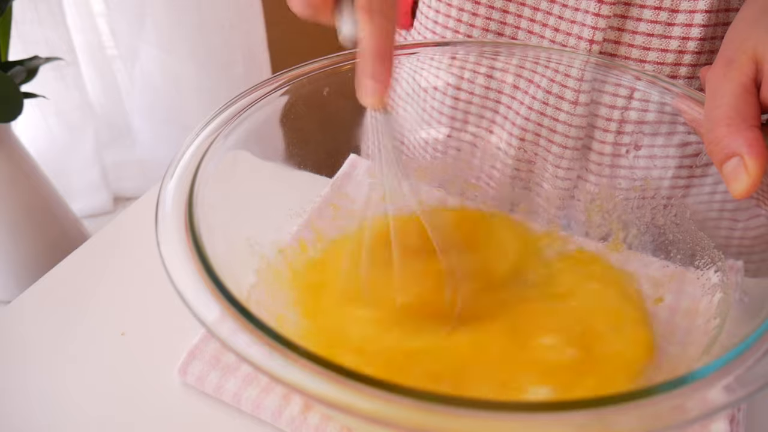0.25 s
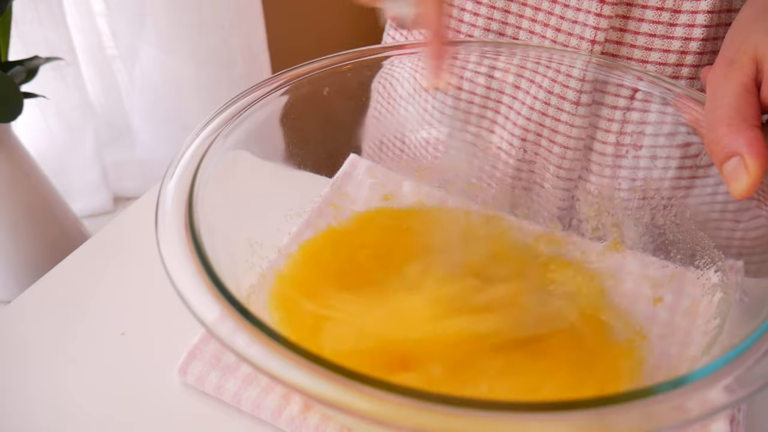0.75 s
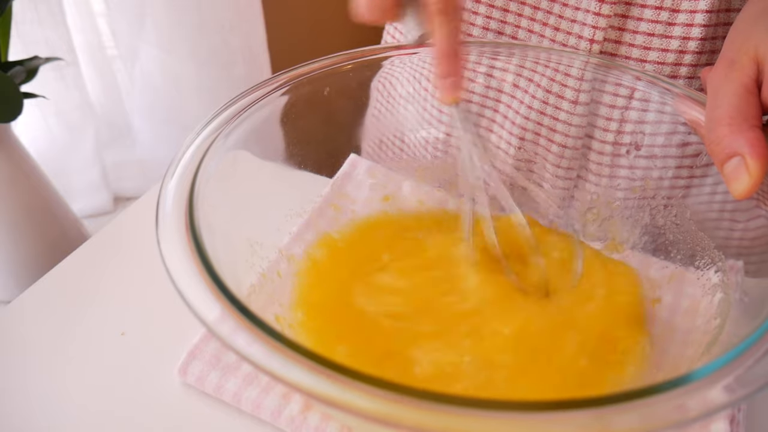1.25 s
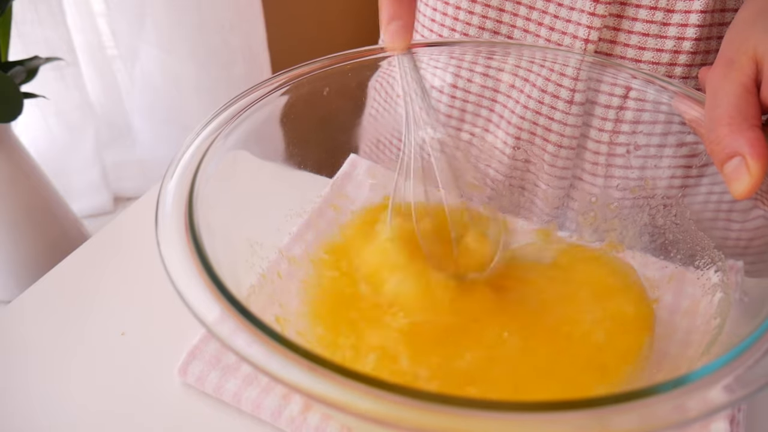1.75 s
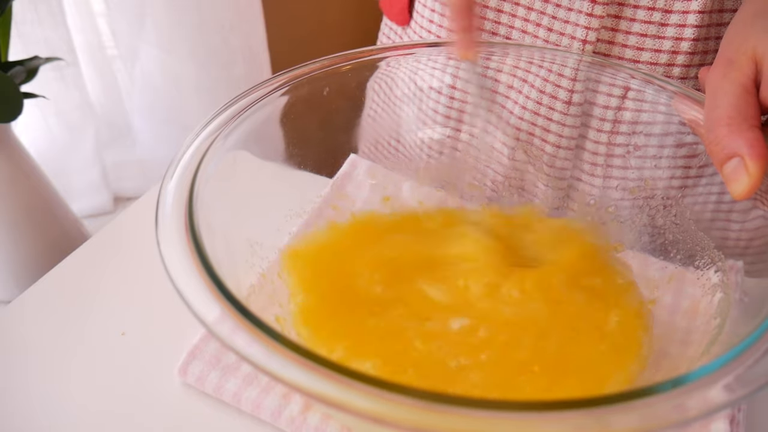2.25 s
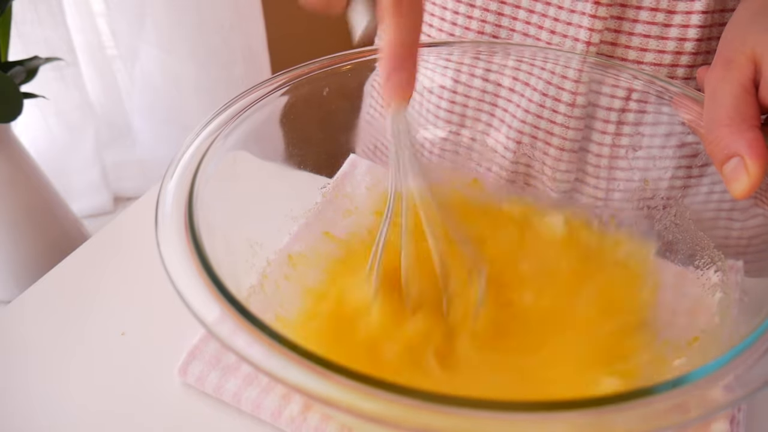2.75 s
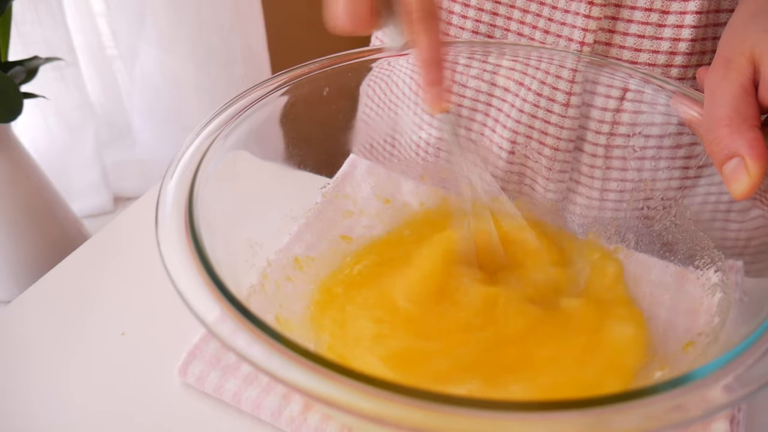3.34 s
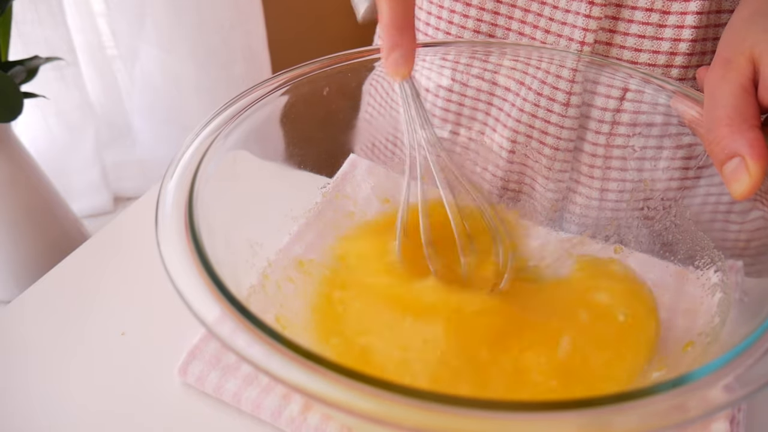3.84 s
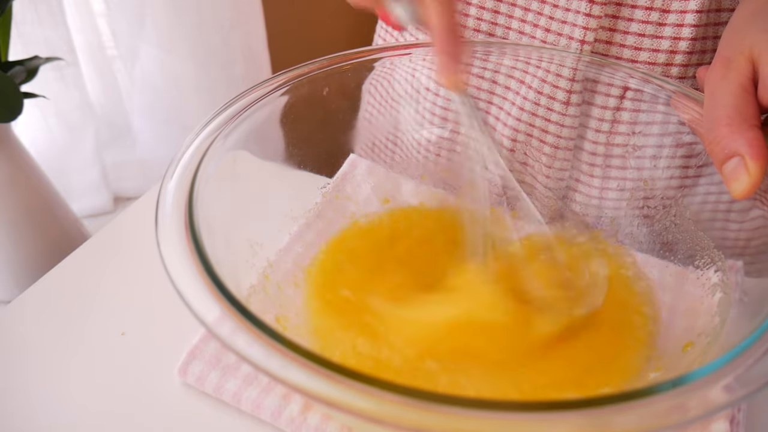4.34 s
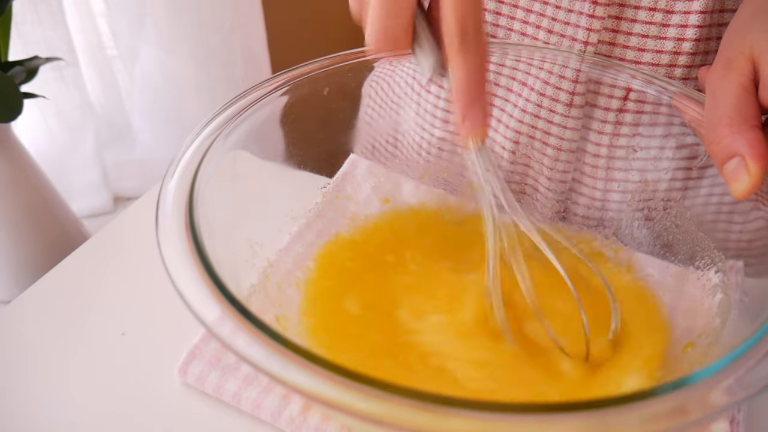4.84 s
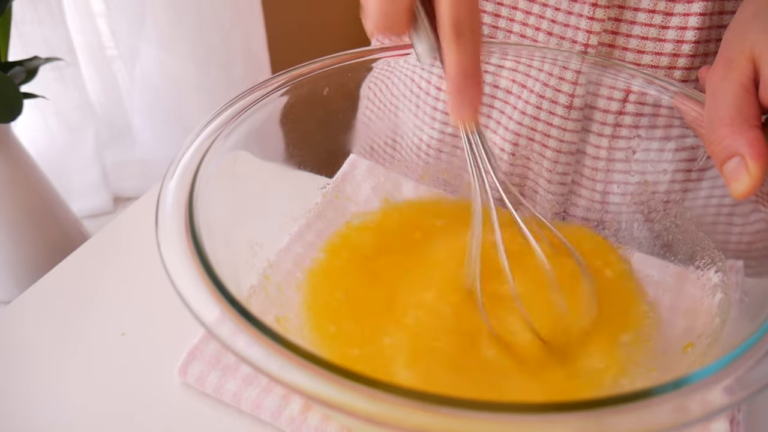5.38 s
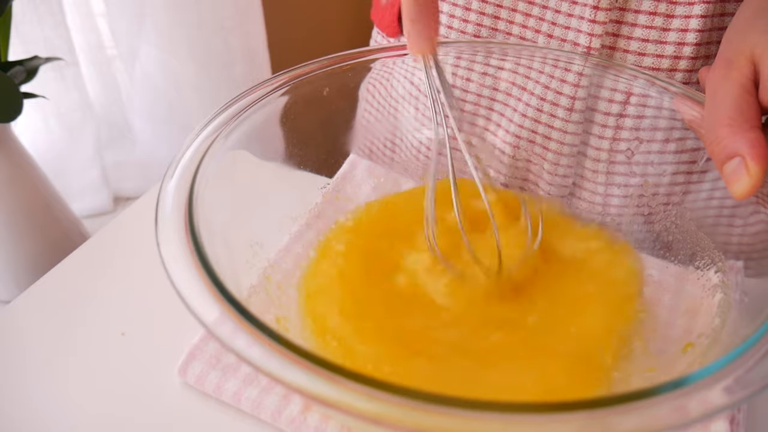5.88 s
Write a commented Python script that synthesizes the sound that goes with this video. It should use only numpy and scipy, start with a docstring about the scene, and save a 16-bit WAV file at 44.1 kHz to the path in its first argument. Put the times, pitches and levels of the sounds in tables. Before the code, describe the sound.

Rapid regular whisking: thin wires tick on glass, liquid egg fizzes, gurgles and sloshes low, and small bubbles pop sharply between strokes. It starts light and uneven, grows firmer, becomes deeper and irregular in the middle with low glugs, then settles into even, brighter, drier taps. The bowl sits on cloth, so its ring is very short. Close stereo pickup, little room echo, almost silent background.

```python
"""In a small, dry kitchen, a wire whisk beats eggs and sugar in a glass bowl on a folded cloth, close up.
About four and a half times a second, bursts of clicks strike glass modes and filtered noise drags through egg:
a wet fizz of snaps and pings, gurgles in the bowl's hollow, a low slosh. Midway, deep beating glugs with air;
toward the end the whisk stirs, with harder clicks and less fizz. Films and pockets burst as short damped pings."""
import sys
import numpy as np
from scipy import signal
from scipy.fft import rfft, irfft, next_fast_len
from scipy.io import wavfile
from scipy.ndimage import map_coordinates

SR = 44100
rng = np.random.default_rng(int(sys.argv[2]) if len(sys.argv) > 2 else 0)


def master_out(mix):
    """Clip the mix to full scale and print it as 16-bit PCM to the path in sys.argv[1]."""
    frames = np.transpose(np.atleast_2d(mix))
    ceiling = np.clip(frames, -1, 1)
    pcm = np.round(ceiling * 32767).astype(np.int16)
    wavfile.write(sys.argv[1], SR, pcm)


N = 269451  # length [samples]

# Levels are relative: each layer trims them again in the mix.
# quiet of the kitchen: (frequency [Hz], density [dB per Hz, relative])
QUIET_COLOUR = [(20, -4), (50, 0.5), (100, -7.5), (250, -16.5), (600, -20), (1000, -26.5), (3000, -24.5),
                (8000, -33), (16000, -39)]
QUIET_DB = -64  # rms

# one turn of the whisk, wires landing on glass then dragging through egg:
# (time [s], drag length [s], click [dB], knock [dB], mass of egg pushed [dB], fizz [dB])
STROKES = [(.0045, 0.13, -32, -43.5, -55, -36.5), (0.2119, 0.088, -37.5, -53, -53.5, -42),
           (0.4335, 0.14, -37, -36.5, -60.5, -41), (0.647, .085, -52, -49, -68.5, -50.5),
           (.862, 0.1, -33, -38, -52, -39), (1.0723, .12, -31.5, -31.5, -51, -30.5),
           (1.28, 0.1, -25.5, -30, -51, -36), (1.4798, 0.12, -29, -30, -52, -36),
           (1.685, 0.078, -24.5, -30, -48, -33.5), (1.8823, 0.086, -31.5, -30, -46, -38),
           (2.111, 0.066, -35, -34.5, -51, -30), (2.223, 0.12, -48, -55, -58.5, -42.5),
           (2.344, 0.072, -38, -42.5, -55.5, -43), (2.4221, 0.13, -32, -40, -62.5, -43),
           (2.599, 0.053, -32.5, -42, -63, -38.5), (2.668, .15, -42, -45, -53, -38),
           (2.788, 0.07, -31, -66, -70, -55.5), (2.9014, 0.092, -48, -30.5, -60, -41.5),
           (3.014, 0.071, -71, -58, -75, -55.5), (3.118, 0.062, -36, -58, -53, -34),
           (3.3693, 0.083, -27.5, -33, -51.5, -41), (3.579, 0.097, -27, -32.5, -49, -41.5),
           (3.772, .12, -34.5, -40, -50, -36.5), (3.9812, .11, -31.5, -36.5, -52, -40.5),
           (4.2068, .12, -27, -39, -50, -40), (4.4383, 0.12, -23, -34, -53, -42.5),
           (4.6594, 0.1, -24.5, -29, -53, -45), (4.8975, 0.13, -22, -36.5, -52.5, -52),
           (5.1414, .11, -24, -37.5, -50, -46.5), (5.367, .11, -23.5, -34.5, -50.5, -46.5),
           (5.598, 0.097, -22.5, -25, -52.5, -44), (5.8296, 0.09, -29, -28, -48.5, -48),
           (6.049, 0.072, -23.5, -29, -49, -38)]
# wires catching the glass again within a stroke: (time [s], click [dB], knock [dB])
CATCHES = [(.0918, -32, -59), (0.482, -41.5, -64), (0.5147, -39, -63), (1.0904, -35, -53),
           (1.1266, -35, -61), (1.4911, -33, -45), (1.889, -32.5, -33.5), (1.9308, -40, -49),
           (2.1209, -28.5, -37.5), (2.2713, -33.5, -48), (2.29, -36.5, -50), (2.4564, -41, -66),
           (2.5405, -38, -58), (2.621, -27.5, -33.5), (2.6793, -27, -42), (3.101, -38, -76),
           (3.14, -32, -40.5), (3.38, -30, -32.5), (3.8152, -35.5, -39), (3.997, -38, -42.5),
           (4.2232, -31.5, -41), (4.9566, -32, -62), (5.357, -40, -68), (5.389, -38, -52),
           (5.435, -34.5, -47), (5.4939, -38.5, -82), (5.8362, -29, -34), (5.8473, -32, -40)]
# single wires graze the glass at random during each drag
GRAZE_DB, GRAZE_SPREAD_DB, GRAZE_KNOCK_DB = -50.5, 0.5, -66.5

# colour of wire on glass: (frequency [Hz], density [dB per Hz, relative])
CLICK_COLOUR = [(500, -18), (900, -11), (1300, -6.5), (1900, -5.5), (2800, -1.5), (4200, -2.5),
                (5400, -6.5), (7400, -3), (9500, -3), (12000, -5), (15000, -7), (16500, -27)]
# colour of the bowl being knocked: (frequency [Hz], density [dB per Hz, relative])
KNOCK_COLOUR = [(30, -46), (80, -4), (180, -2.5), (300, -0.5), (450, -2.5), (700, -12.5), (1200, -27.5),
                (3000, -54.5)]
# colour of the bowl's hollow: (frequency [Hz], density [dB per Hz, relative])
HOLLOW_COLOUR = [(200, -26), (420, -7.5), (540, 2.5), (630, 6), (700, 1), (815, -18), (1200, -38),
                 (3000, -41)]
# modes of the bowl, damped by hand and cloth: (frequency [Hz], level [dB], 60 dB decay time [s])
GLASS_MODES = [(1314, -32.5, 0.018), (2780, -47.5, 0.018), (3656, -51, 0.088), (4870, -42, 0.033),
               (7570, -41.5, 0.037), (8800, -43.5, .04), (11500, -36.5, 0.044)]
# the hollow's level lies this share of the way from click to knock, then is offset
HOLLOW_FROM_KNOCK, HOLLOW_UNDER_DB = 0.3, -5.5
# egg covers more or less of the bowl from blow to blow: largest pitch shift of its hollow, as a share
HOLLOW_SHIFT = .07

# colour of egg tearing from the wires: (frequency [Hz], density [dB per Hz, relative])
FIZZ_COLOUR = [(500, -17.5), (900, -9.5), (1300, -11), (1900, -8.5), (2850, 3), (3600, -3.5), (4300, 0.5),
               (5500, -4), (7400, 3.5), (9500, -2), (12000, -3), (15000, -8), (16500, -20.5)]
# fizz reached by the end of a drag, however it starts: (time [s], level [dB])
SETTLED_FIZZ = [(.1, -43), (.3, -53.5), (.7, -64.5), (.95, -45), (1.2, -54.5), (1.8, -48), (2.15, -53.5),
                (2.55, -41), (3, -46.5), (3.45, -49.5), (3.9, -50.5), (4.1, -74), (4.35, -48.5), (5.4, -47),
                (5.7, -54.5), (6.1, -57)]
# colour of the low slosh: (frequency [Hz], density [dB per Hz, relative])
SLOSH_COLOUR = [(15, -32), (35, -14), (52, 2), (70, -12), (110, -13), (200, -48.5), (600, -55.5)]
# how far the bowl rocks on its cloth for the same push: (time [s], gain [dB])
ROCKING = [(0, 1), (.6, -7), (1.1, 1.5), (1.7, -1), (2.1, -1.5), (2.3, -10), (2.8, 0), (3.8, 1.5),
           (4.3, -2), (5.1, 6.5), (6.1, -1)]

# a pocket of air closes in the wake of each stroke, louder the more egg is pushed
WAKE_S, WAKE_OVER_DB, WAKE_HZ = 0.081, 5, 603
# short low tones and pings: closing air pockets, small bubbles, and one low knock tone:
# (time [s], peak [dB], starting pitch [Hz])
SHORT_TONES = [(2.268, -32.5, 674), (2.288, -31.5, 675), (2.36, -35.5, 3280), (2.426, -33, 983),
               (2.495, -39.5, 1920), (2.904, -25, 178), (3.247, -54.5, 683), (4.984, -38, 652)]
# bursting bubbles and films of egg:
# (time [s], level over a millisecond [dB], pitch [Hz], width [Hz], ring of the bowl's air [dB])
POPS = [(.124, -16.5, 7100, 1050, -34), (0.138, -28.5, 2520, 615, -47), (.3482, -44, 1390, 420, -55),
        (0.3886, -15, 1510, 724, -40), (0.5688, -11, 10900, 2600, -25), (0.5926, -38, 13100, 2670, -62),
        (.789, -44, 7690, 970, -61), (.8022, -28, 12000, 2150, -41.5), (1.0487, -27.5, 3000, 650, -39),
        (1.2321, -35.5, 2800, 510, -65), (1.4484, -31, 8750, 1180, -39.5), (1.86, -40, 1130, 360, -44),
        (1.9974, -38.5, 1340, 380, -48), (2.0198, -22.5, 3400, 480, -32.5),
        (3.7334, -26, 4840, 1050, -28.5), (3.9431, -28.5, 2550, 1710, -55), (3.9503, -21, 6670, 1650, -44),
        (3.9594, -28.5, 7900, 1930, -55), (4.152, -44.5, 3160, 1500, -58)]
# a faint film breaks as the whisk comes round, shortly before it lands
FILM_LEAD_S, FILM_DB, FILM_SPREAD_DB, FILM_HZ, FILM_WIDTH_HZ = 0.015, -51.5, 5.5, 2200, 960
# a faint noise swells up to each click, louder before a louder click
SWELL_S, SWELL_UNDER_DB, SWELL_RISE_S = 0.022, -25.5, 0.0079
# air beaten in while the whisk stays deep: (time [s], level of the glugs [dB])
GLUGS = [(2.2, -53), (2.3, -63), (2.43, -44.5), (2.58, -57), (2.68, -57), (2.9, -50.5), (3.2, -71)]

# how much louder the left microphone is than the right: (frequency [Hz], gain [dB])
LEFT_GAIN = [(50, 0), (120, 5), (300, 4.5), (700, 7.5), (1300, 4), (2400, 2), (4400, 3.3), (8000, .5),
             (15000, 3.5)]
# how far the left microphone lags for a source fully aside: (frequency [Hz], phase [rad])
LEFT_LAG = [(200, 0), (700, .1), (1500, .45), (4000, .55), (6000, 1.4), (9000, 1.6), (15000, 1.5)]
# the kitchen's ring: (frequency [Hz], 60 dB decay time [s])
KITCHEN_DECAY = [(100, 0.23), (1000, 0.41), (4000, 0.31), (14000, 0.057)]
EDGE_HZ = 16500  # top of the band


def amp(db):
    """Decibels to gain."""
    return 10 ** (np.asarray(db) / 20)


def unit(x):
    """Scales to rms 1."""
    return x / np.sqrt(np.mean(x ** 2) + 1e-20)


def scatter(shape=None):
    """Random values between -1 and 1."""
    return 2 * rng.random(shape) - 1


def seconds(length):
    """Time axis of the given length."""
    return np.arange(int(length * SR)) / SR


def over_time(points, **edges):
    """Joins (time, value) points over the whole scene."""
    return np.interp(np.arange(N) / SR, *np.transpose(points), **edges)


def over_pitch(points, hz):
    """Joins (Hz, value) points on a log-frequency axis."""
    f, value = np.transpose(points)
    return np.interp(np.log(hz + 1), np.log(f + 1), value)


def add(mix, s, sound):
    """Mixes a sound in at time s."""
    part = mix[max(round(s * SR), 0):][:len(sound)]
    part += sound[:len(part)]


def ring(colour, size=8192):
    """Causal minimum-phase impulse response of energy 1 with the given colour."""
    log_gain = np.log(amp(over_pitch(colour, abs(np.fft.fftfreq(size, 1 / SR)))))
    h = np.fft.ifft(np.exp(np.conj(signal.hilbert(log_gain)))).real[:size // 2]
    return h / np.linalg.norm(h)


def through(x, h):
    """Passes x through the impulse response h."""
    return signal.oaconvolve(x, h)[:len(x)]


def crackle(n, per_s, spread_db):
    """A train of tiny clicks, most small and a few large, rms 1."""
    size = amp(spread_db * np.minimum(rng.exponential(1, n), 3.5))
    return unit(size * rng.choice([-1, 1], n) * (rng.random(n) < per_s / SR))


def lumps(depth_db, lump_s):
    """A gain of rms 1 that glides to a new random value every lump_s."""
    knots = np.arange(0, N / SR + 1, lump_s)
    heights = rng.standard_normal(8192)[:len(knots)]
    return unit(amp(depth_db * np.interp(np.arange(N) / SR, knots, heights)))


def patchy(x, depth_db, patch_hz, patch_s):
    """The colour shifts from moment to moment as pockets of many sizes open and close."""
    hz, when, z = signal.stft(x, SR, nperseg=256)
    field = rng.standard_normal((128, 2048))
    grid = np.meshgrid(hz / patch_hz, when / patch_s, indexing="ij")
    db = depth_db * map_coordinates(field, grid, order=1, mode="wrap")
    # the colour moves while the mean power gain stays put
    gain = amp(db) / np.sqrt(np.mean(amp(db) ** 2, axis=0))
    return signal.istft(z * gain, SR, nperseg=256)[1][:N]


def bubbles(per_s, cycles, spread_db, low_hz, high_hz, rise=0.067, count=40):
    """Small bubbles of many sizes, each a short decaying ping that rises in pitch; rms 1."""
    out = np.zeros(N)
    for hz in np.geomspace(low_hz, high_hz, count):
        life = cycles / hz
        t = seconds(5 * life)
        ping = np.sqrt(hz) * np.exp(-t / life) * np.sin(2 * np.pi * hz * t * (1 + rise * t / t[-1]))
        pings = max(round(per_s * N / SR / count), 1)
        when, chance, side = rng.random((256, 3))[:pings].T
        sizes = np.sign(side - .5) * amp(spread_db * np.minimum(-np.log(chance), 3.5))
        for s, size in zip(when * N / SR, sizes):
            add(out, s, size * ping)
    return unit(out)


def quiet_room():
    """Steady coloured noise, independent at the two microphones."""
    colour = ring(QUIET_COLOUR)
    return amp(QUIET_DB) * np.array([through(rng.standard_normal(N), colour) for _ in range(2)])


def contacts():
    """Every touch of wire on glass: landings, catches and random grazes, as (s, click dB, knock dB)."""
    landings = [(s, click, knock) for s, _, click, knock, *_ in STROKES]
    chance = rng.random((len(STROKES), 2, 2))  # two grazes a drag
    grazes = [(s + length * when, GRAZE_DB + GRAZE_SPREAD_DB * (2 * force - 1), GRAZE_KNOCK_DB)
              for (s, length, *_), draws in zip(STROKES, chance) for when, force in draws]
    return landings + CATCHES + grazes


def glass(x):
    """The contact itself, plus the short ring of the bowl as decaying modes."""
    t = seconds(.12)
    modes = sum(amp(db - 60 * t / t60) * np.cos(2 * np.pi * hz * t) for hz, db, t60 in GLASS_MODES)
    return x + through(x, modes)


def strikes(rise_s=0.00036, chatter_s=0.0035, tail_db=-17, tail_s=0.017, click_db=-1, knock_db=0,
            hollow_db=0, top_db=-2, top_spread_db=3, rattle=1.0, hinge_hz=6000):
    """The wires land one after another within a few ms; their push knocks the bowl and rings its hollow."""
    t = seconds(.06)
    chatter = np.exp(-t / chatter_s) + amp(tail_db) * np.exp(-t / tail_s)
    chatter = (1 - np.exp(-t / rise_s)) ** 2 * chatter
    clicks, knocks, hollows = np.zeros((3, N))
    treble = signal.butter(2, hinge_hz, "high", fs=SR)
    bass = signal.butter(2, hinge_hz, fs=SR)
    knock = ring(KNOCK_COLOUR)
    # unit-energy sounds scaled so that levels hold over 5 ms (click) and 8 ms (thud)
    click_span, thud_span = np.sqrt(.005 * SR), np.sqrt(.008 * SR)
    for s, db, low_db in contacts():
        ring_db = db + HOLLOW_FROM_KNOCK * (low_db - db) + HOLLOW_UNDER_DB
        wires = chatter * crackle(len(t), per_s=9000, spread_db=1.0)
        # bare glass gives a bright click, a cushion of egg a dull one
        brightness = amp(top_db + top_spread_db * scatter())
        wires = signal.lfilter(*bass, wires) - brightness * signal.lfilter(*treble, wires)
        wires /= np.linalg.norm(wires)
        add(clicks, s, amp(db + click_db) * click_span * wires)
        # the bowl feels one firm push with the rattle of the wires on top
        push = rattle * wires
        push[40] -= 1
        hollow = ring(np.array(HOLLOW_COLOUR) * [1 + HOLLOW_SHIFT * scatter(), 1])
        thuds = (knocks, knock, low_db + knock_db), (hollows, hollow, ring_db + hollow_db)
        for mix, body, level_db in thuds:
            thud = through(push, body)
            add(mix, s, amp(level_db) * thud_span * thud / np.linalg.norm(thud))
    return glass(through(clicks, ring(CLICK_COLOUR))) + knocks + hollows


def stroke_level(start_db, end_db, rise_s, release_s, lead_db=-22, lead_s=0.061):
    """Level over all strokes: a faint swell before each, a rise as the wires dig in, a slide in dB, a release."""
    power = np.zeros(N + SR)  # one second of margin ahead of the first stroke
    t = seconds(.5) - .1
    for (s, length, *_), first, last in zip(STROKES, start_db, end_db):
        slide = amp(np.interp(t, [0, length], [first, last]))
        faint_swell = amp(lead_db) * np.exp(-abs(t) / lead_s)
        rise = 1 - np.exp(-(np.maximum(t, 0) / rise_s) ** 2) + faint_swell
        release = np.exp(-np.maximum(t - length, 0) / release_s)
        add(power, 1 + s + t[0], (slide * rise * release) ** 2)
    return np.sqrt(power[SR:])


def froth(fizz_db=-5, bubble_db=-10.0, clump_db=3, clump_s=0.0049, stray_db=-75):
    """Egg tears from the wires in clumps of tiny snaps and bubbles."""
    start, length, *_, first = np.transpose(STROKES)
    last = np.interp(start + length, *np.transpose(SETTLED_FIZZ))
    snaps = lumps(clump_db, clump_s) * crackle(N, per_s=7000, spread_db=3.5)
    snaps = patchy(snaps, depth_db=4.5, patch_hz=650, patch_s=.011)
    pings = bubbles(per_s=750, cycles=14, spread_db=2.5, low_hz=800, high_hz=5000, rise=.025)
    # the drag comes in slaps as one wire after another cuts the egg
    slaps = lumps(depth_db=2.8, lump_s=.011)
    level = slaps * stroke_level(first, last, rise_s=0.0039, release_s=0.024)
    fizz = level * (amp(fizz_db) * snaps + amp(bubble_db) * pings)
    # a few bubbles keep bursting in the foam between strokes
    stray = amp(stray_db) * bubbles(per_s=25, cycles=1.5, spread_db=5, low_hz=1300, high_hz=11000)
    return glass(through(fizz + stray, ring(FIZZ_COLOUR)))


def liquid(churn_db=-3, gurgle_db=-2, blub_db=-6, squelch_db=-11, slosh_db=0,
           churn_fall_db=6, gurgle_fall_db=4, slosh_fall_db=5, apart_db=-3):
    """The mass of egg churns, gurgles in the hollow of the bowl, and rocks it on the table."""
    *_, egg, _ = np.transpose(STROKES)

    def falling(fall_db, rise_s, release_s):
        """Each push starts above its mean level and slides as far below."""
        return stroke_level(egg + fall_db, egg - fall_db, rise_s, release_s)

    churning = falling(churn_fall_db, rise_s=0.0018, release_s=0.008)
    gurgling = falling(gurgle_fall_db, rise_s=0.0025, release_s=0.02)
    rocking = falling(slosh_fall_db, rise_s=0.0048, release_s=0.024) * amp(over_time(ROCKING))
    churn = through(churning * crackle(N, per_s=900, spread_db=.5), ring(KNOCK_COLOUR))
    gurgle = through(gurgling * crackle(N, per_s=600, spread_db=2.0), ring(HOLLOW_COLOUR))
    # the wake of the wires squelches shut
    squelch = gurgling * bubbles(per_s=400, cycles=4, spread_db=2.5, low_hz=850, high_hz=2300)
    # large bubbles folded into the egg
    blub = churning * bubbles(per_s=140, cycles=5.1, spread_db=0.5, low_hz=160, high_hz=737)
    body = amp(churn_db) * churn + amp(gurgle_db) * gurgle
    body += amp(squelch_db) * squelch + amp(blub_db) * blub
    # the rocking reaches each microphone through the table, partly unrelated
    slosh = ring(SLOSH_COLOUR)
    shared, apart = (amp(slosh_db) * rocking * unit(through(rng.standard_normal(N), slosh))
                     for _ in range(2))
    return body, shared + amp(apart_db) * np.outer([1, -1], apart)


def wakes(pitch_spread=0.2):
    """The air pocket behind each stroke, as (s, peak dB, starting pitch Hz)."""
    chance = scatter((len(STROKES), 2))
    return [(s + WAKE_S * (1 + .5 * when), egg_db + WAKE_OVER_DB, WAKE_HZ * (1 + pitch_spread * pitch))
            for (s, _, _, _, egg_db, _), (when, pitch) in zip(STROKES, chance)]


def short_tones(life_s=0.0057, rise_s=0.0033, glide_per_s=5.4):
    """Closing pockets, small bubbles and one low knock tone: brief decaying sines that glide up in pitch."""
    out, t = np.zeros(N), seconds(.05)
    shape = (1 - np.exp(-t / rise_s)) * np.exp(-t / life_s)
    shape /= shape.max()
    for s, db, hz in SHORT_TONES + wakes():
        tone = np.sin(2 * np.pi * hz * t * (1 + glide_per_s * t / 2))
        add(out, s, amp(db) * shape * tone)
    return out


def films(air_db=-56):
    """Faint bursts before each landing but the first, with the same columns as POPS."""
    chance = scatter((len(STROKES), 3))
    return [(s - FILM_LEAD_S * 2 ** when, FILM_DB + FILM_SPREAD_DB * force,
             FILM_HZ * 2 ** pitch, FILM_WIDTH_HZ, air_db)
            for (s, *_), (when, force, pitch) in zip(STROKES[1:], chance)]


def pops(snap_db=-5, snap_s=0.0005, tear_size=1.75, crack_power=1.8, rise_s=.0001,
         cavity_hz=1230, cavity_db=0, cavity_s=0.0027, scatter_db=-24, scatter_s=0.0045,
         lead_db=-24, lead_s=0.0075, low_hz=780):
    """A film snaps, its pocket rings very briefly, and the air in the bowl answers."""
    out, t = np.zeros(N), seconds(.015)
    click = ring(CLICK_COLOUR)[:len(t)]
    millisecond = np.sqrt(.001 * SR)
    for s, db, hz, width, air_db in POPS + films():
        pocket = np.exp(-np.pi * width * t) * np.sin(2 * np.pi * hz * t) * (1 - np.exp(-t / rise_s))
        pocket /= abs(pocket).max()
        # the more damped the pocket, the more of the burst is a broad crack
        tear = rng.standard_normal(len(t)) * np.exp(-t / snap_s) * tear_size
        tear[0] = 1
        pop = pocket + amp(snap_db) * (width / 1600) ** crack_power * through(tear, click)
        # a short noisy smear follows the burst
        smear = rng.standard_normal(len(t)) * amp(scatter_db) * np.exp(-t / scatter_s) * .5
        pop += through(pop, smear)
        air = amp(air_db + cavity_db) * np.exp(-t / cavity_s) * np.sin(2 * np.pi * cavity_hz * t)
        add(out, s, amp(db) * millisecond * pop / np.linalg.norm(pop) + air)
        # a faint crackle at the burst's own pitch swells up to it
        lead_in = crackle(len(t), per_s=4000, spread_db=3) * np.exp(-t / lead_s)[::-1]
        lead_in = through(lead_in, pocket / np.linalg.norm(pocket))
        add(out, s - t[-1], amp(db + lead_db) * lead_in)
    # so small a source radiates little bass
    return signal.lfilter(*signal.butter(N=3, Wn=low_hz, btype="high", fs=SR), out)


def click_swells():
    """A faint noise swells up to each stroke's click but the first, louder before a louder click."""
    out, t = np.zeros(N), seconds(SWELL_S)
    for s, _, click_db, *_ in STROKES[1:]:
        swell = amp(click_db + SWELL_UNDER_DB) * np.exp((t - SWELL_S) / SWELL_RISE_S)
        add(out, s - SWELL_S, swell * crackle(len(t), per_s=3000, spread_db=2))
    return glass(through(out, ring(CLICK_COLOUR)))


def glugs(deep_db=0, splash_db=-2):
    """Hard beating folds in big pockets that glug and smaller ones that plink."""
    flat = np.zeros(len(STROKES))
    level = amp(over_time(GLUGS, left=-120, right=-120))
    level = level * stroke_level(flat, flat, rise_s=.006, release_s=0.013)
    deep = bubbles(per_s=50, cycles=2.6, spread_db=0.5, low_hz=96, high_hz=490, rise=0.17)
    splash = bubbles(per_s=90, cycles=8, spread_db=2.5, low_hz=611, high_hz=3290, rise=.05)
    return level * (amp(deep_db) * deep + amp(splash_db) * splash)


def microphones(x, aside):
    """The left microphone is louder and its phase lags, the more so the further aside the source is."""
    size = next_fast_len(N)
    hz = np.fft.rfftfreq(size, 1 / SR)
    left = amp(over_pitch(LEFT_GAIN, hz)) * np.exp(-1j * aside * over_pitch(LEFT_LAG, hz))
    pair = np.array([left, np.ones(len(hz))])
    pair /= np.sqrt(np.mean(abs(pair) ** 2, axis=0))  # keeps the mean power of the two
    return irfft(rfft(x, size) * pair, size)[:, :N]


def sway(pair, depth_db=1.1, sway_s=.012):
    """The sound comes from all over the bowl, now nearer one microphone, now the other."""
    return pair * np.array([lumps(depth_db, sway_s) for _ in pair])


def glints(pair, turn=.9, glint_s=.0015, above_hz=4500):
    """Short waves scatter off moving wires and egg, so their phase wanders apart at the two microphones."""
    knots = np.arange(0, N / SR + 1, glint_s)
    highpass = signal.butter(3, above_hz, "high", fs=SR, output="sos")
    treble = signal.sosfiltfilt(highpass, pair)
    wander = [unit(np.interp(np.arange(N) / SR, knots, rng.standard_normal(len(knots)))) for _ in pair]
    analytic = signal.hilbert(treble, next_fast_len(N))[:, :N]
    return pair - treble + (analytic * np.exp(1j * turn * np.array(wander))).real


def kitchen(x, early_db=-13, early_s=0.0028, late_db=-21):
    """Close reflections from bowl and table, then a faint short tail, different in each microphone."""
    t = seconds(.4)
    hz, when, z = signal.stft(rng.standard_normal((2, len(t))), SR, nperseg=256)
    decay = amp(-60 * when / over_pitch(KITCHEN_DECAY, hz)[:, None])
    tails = signal.istft(z * decay, SR, nperseg=256)[1][:, :len(t)]
    early = rng.standard_normal((2, len(t))) * np.exp(-t / early_s) * (t > .0005)
    early = signal.lfilter(*signal.butter(1, 2500, "high", fs=SR), early)
    early *= amp(early_db) / np.linalg.norm(early, axis=1, keepdims=True)
    late = amp(late_db) * tails / np.linalg.norm(tails, axis=1, keepdims=True)
    return np.array([through(x, response) for response in early + late])


def scene(pop_db=2, pop_room_db=-8, whisk_db=0, froth_db=3):
    """Whisk, egg and bursting bubbles close to a pair of microphones, in a quiet kitchen."""
    body, rocking = liquid()
    wires = patchy(strikes(), depth_db=1.53, patch_hz=840, patch_s=0.012) + click_swells()
    contact = amp(whisk_db) * (wires + body + short_tones() + glugs())
    whisk = contact + amp(froth_db) * froth()
    bursts = amp(pop_db) * pops()
    direct = glints(sway(microphones(whisk, aside=.9))) + microphones(bursts, aside=1)
    room = kitchen(whisk + amp(pop_room_db) * bursts)
    return direct + room + rocking + quiet_room()


def record(dry):
    """Full-scale limit, then the band limit."""
    lowpass = signal.firwin(255, EDGE_HZ, window=("kaiser", 8), fs=SR)
    return signal.oaconvolve(np.clip(dry, -1, 1), lowpass[None], "same")


dry = scene()
out = record(dry)
master_out(out)
```